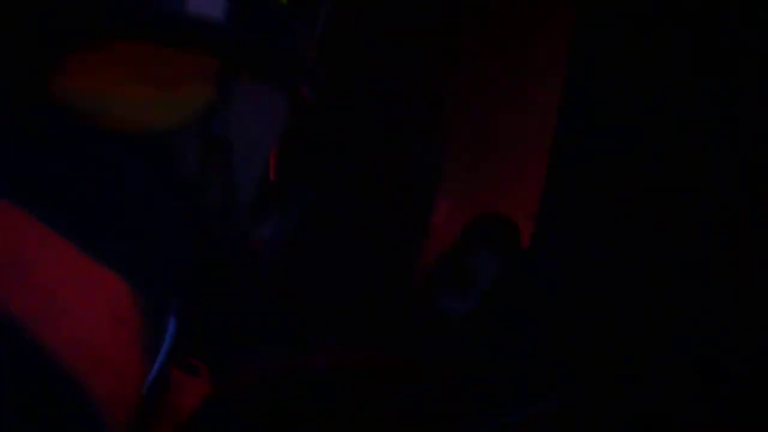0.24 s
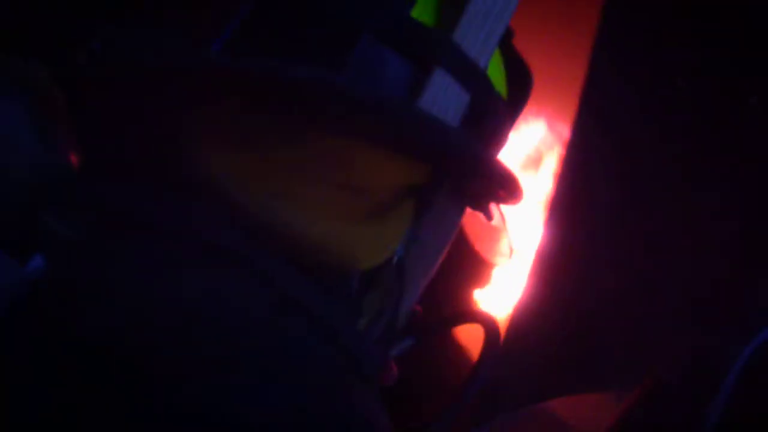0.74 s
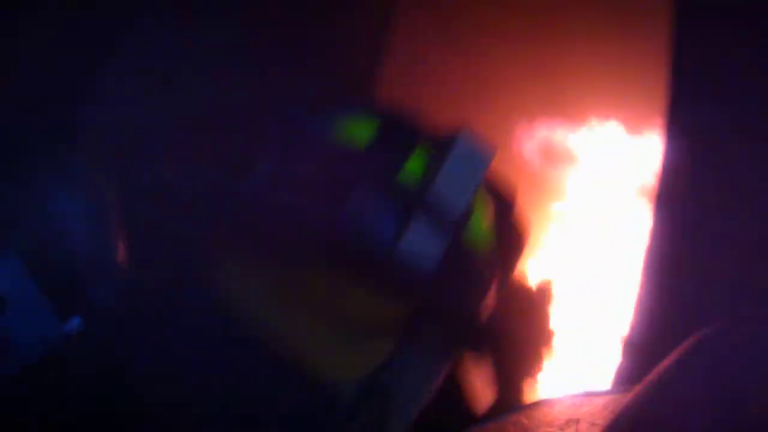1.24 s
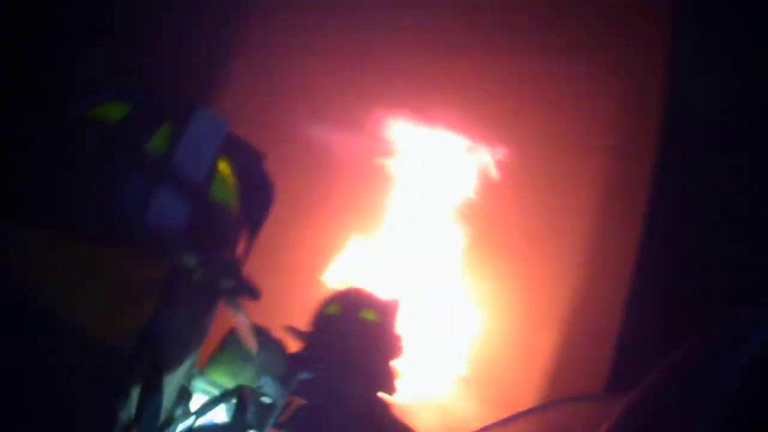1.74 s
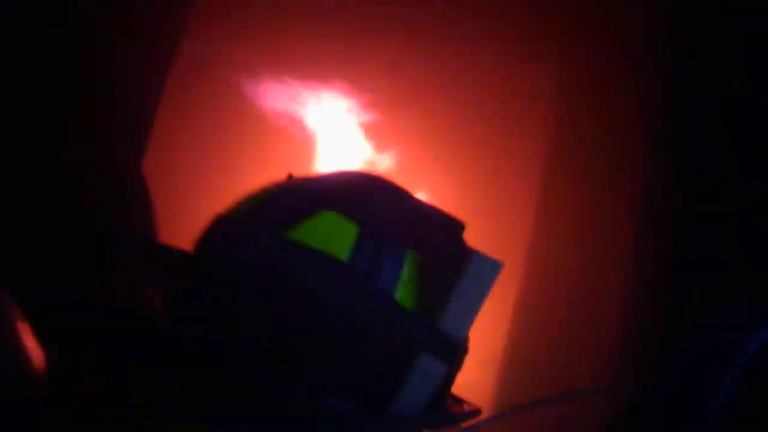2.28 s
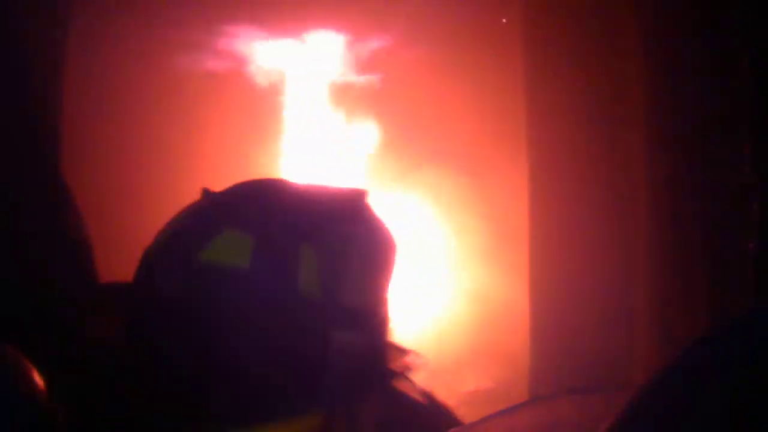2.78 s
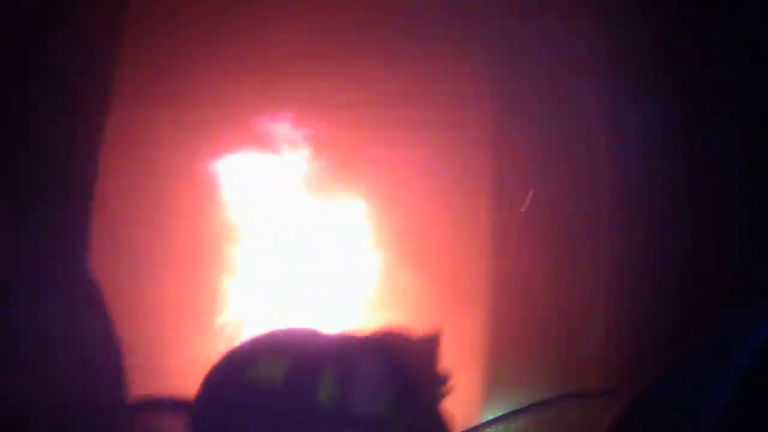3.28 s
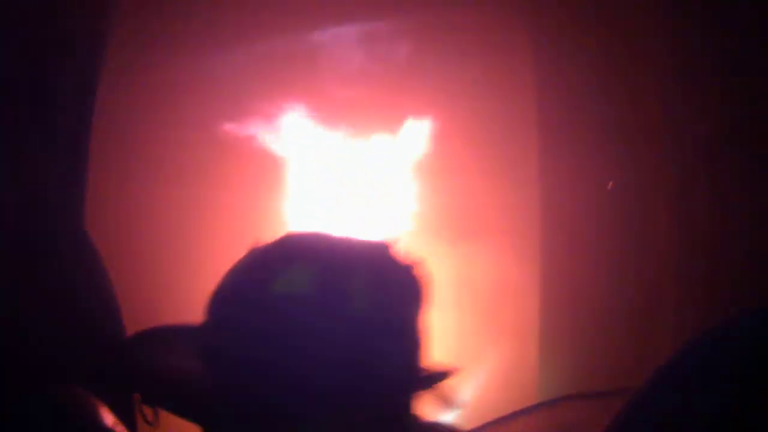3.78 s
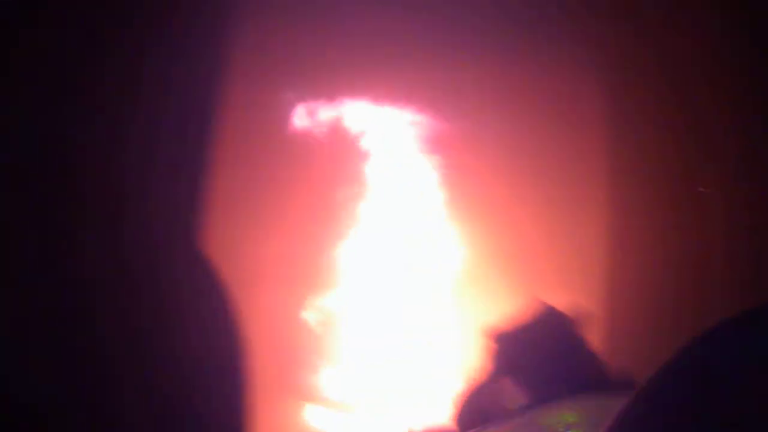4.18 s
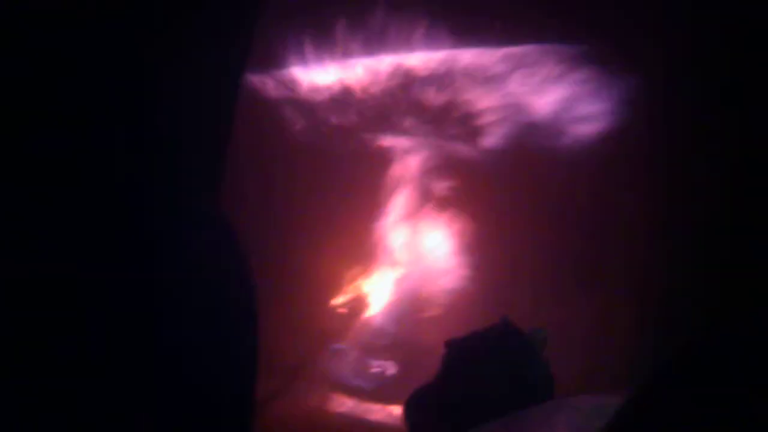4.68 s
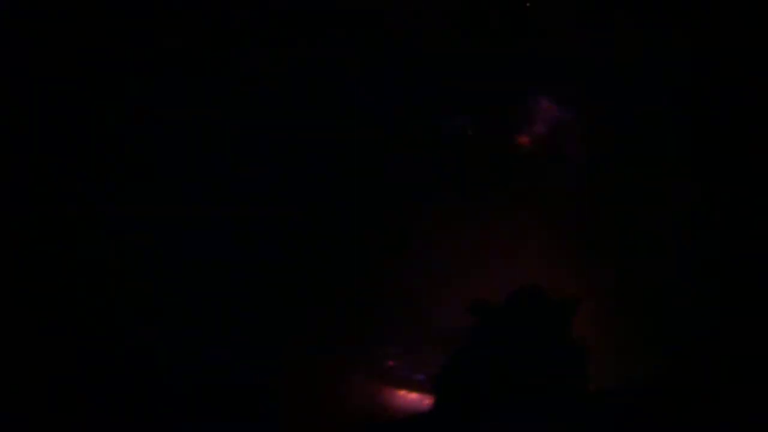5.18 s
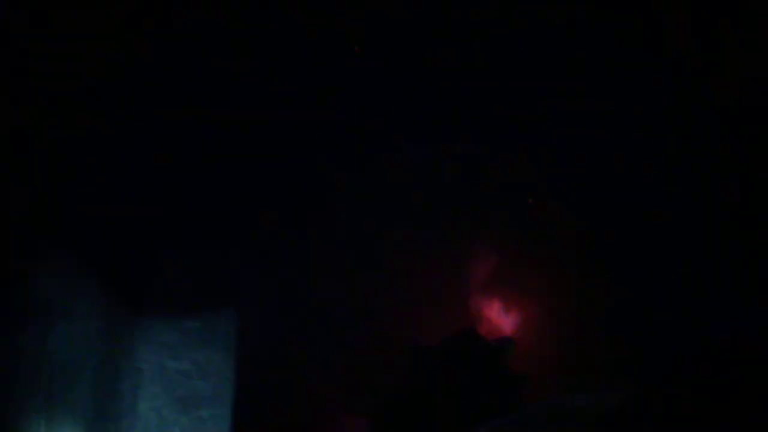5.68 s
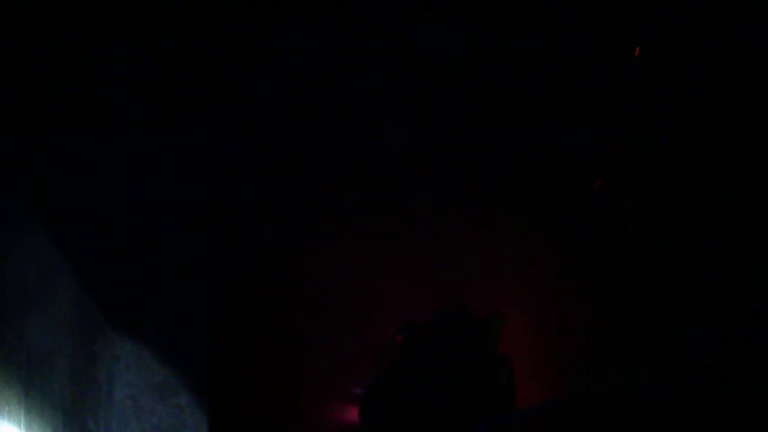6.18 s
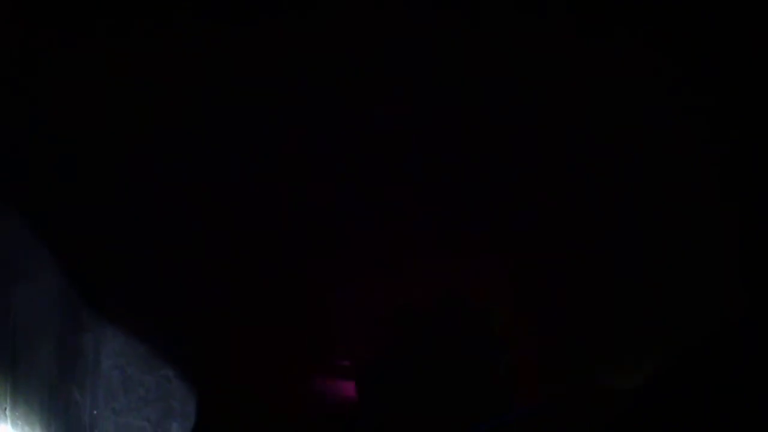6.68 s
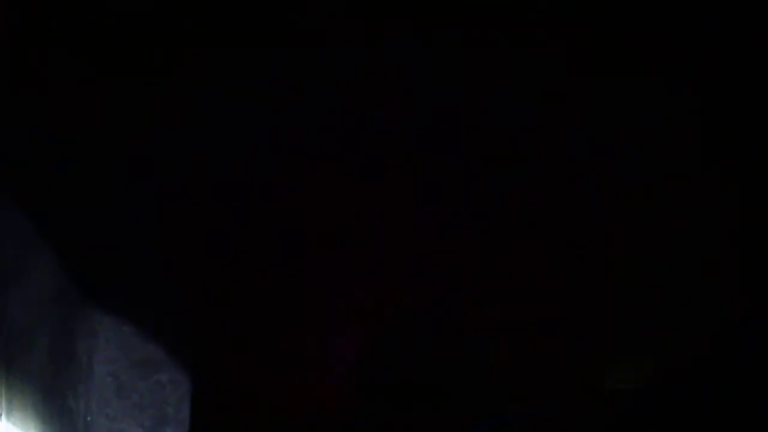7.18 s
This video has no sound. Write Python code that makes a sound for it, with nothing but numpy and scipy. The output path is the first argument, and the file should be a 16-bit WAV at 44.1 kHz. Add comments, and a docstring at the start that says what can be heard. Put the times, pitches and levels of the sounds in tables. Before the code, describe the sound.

Firefighting gear clicks and clatters close up while a water hose hisses in surges and a fire rumbles faintly.

```python
"""A thin hiss of hose spray and a clatter of gear, heard from a closed housing on a helmet in a
burning building. The housing's resonances colour the spray, which sputters and comes in surges over
a low rumble of fire and movement. Gear knocks and rattles, a strap or clip ticks on the housing,
shoves pull the microphone's diaphragm and let it snap back, and soft bumps set the shell humming."""
import sys
import numpy as np
from scipy import signal
from scipy.fft import rfft, irfft
from scipy.io import wavfile

SR = 44100
rng = np.random.default_rng(int(sys.argv[2]) if len(sys.argv) > 2 else 0)


def to_wav(sig):
    """Store sig (one row per channel, or 1-D mono) as 16-bit WAV at the path in sys.argv[1].

    Samples outside -1..1 are clipped; the rate is SR.
    """
    pcm = np.clip(np.atleast_2d(sig), -1, 1) * 32767
    pcm = np.round(pcm).astype(np.int16)
    wavfile.write(sys.argv[1], SR, pcm.T)  # frames by channels


N = 328104

# The spray's bed between surges. Each row: time in seconds, hiss in dB, treble in dB relative to the hiss.
SPRAY_BED = [(0.0, -57.5, -9.5), (0.17, -64.5, -8.5), (0.4, -63, -8), (0.69, -57.5, -11.5),
             (0.8, -60.5, -11), (1.08, -60, -11), (1.2, -50, -16.5), (1.47, -60, -12), (1.76, -54, -13.5),
             (2.02, -57, -14.5), (2.5, -54.5, -13), (3.4, -54.5, -14.5), (4.5, -53.5, -13.5),
             (5.15, -55, -18.5), (5.6, -53.5, -16), (6.0, -53, -20.5), (6.5, -54.5, -17), (7.2, -54.5, -18),
             (7.44, -54.5, -12.5)]
# The jet surges, holds and drops back. Each row: start in seconds, hold in seconds, added hiss in dB.
SPRAY_SURGES = [(2.05, 0.035, -57.5), (2.617, 0.35, -51.5), (3.041, .21, -51.5), (3.525, 0.61, -51.5),
                (4.205, 0.064, -52), (4.387, 0.76, -50.5), (5.16, 0.082, -49.5), (5.309, .2, -50),
                (5.517, 0.19, -50), (5.793, 0.023, -60), (5.968, .04, -50.5), (6.048, 0.011, -52.5),
                (6.198, 0.052, -53.5), (6.309, 0.023, -51.5), (6.54, 0.15, -50), (6.661, .12, -50.5),
                (6.862, .14, -51), (7.032, 0.069, -53.5), (7.177, 0.021, -53.5), (7.248, .3, -49)]
# The housing's resonances. Each row: pitch in Hz, width in Hz, relative level in dB.
HOUSING_LOW_MODES = [(846, 630, -13.5), (1147, 99, -0.5), (1510, 121, 0), (1695, 187, 0), (2049, 181, 1),
                     (2620, 126, -1.5), (2984, 273, -5.5)]
HOUSING_MID_MODES = [(3700, 660, -34), (4665, 500, 27)]
HOUSING_HIGH_MODES = [(6180, 640, -6.5), (7730, 830, -4), (9520, 430, 0.5), (12460, 1030, -1.5),
                      (14440, 1100, -8), (16400, 730, -12)]
# The tone of fire and movement. Each row: frequency in Hz, relative spectral level in dB.
RUMBLE_SPECTRUM = [(8.8, -21), (15, 6.5), (123, -6), (173, -9.5), (203, -10.5), (355, -12.5), (424, -11.5),
                   (768, -20.5), (970, -28.5), (1100, -14.5), (1430, -22), (2420, -120)]
# The rumble's slow rise and fall. Each row: time in seconds, level in dB.
RUMBLE_LEVELS = [(0.0, -67.5), (0.6, -66.5), (2.2, -69), (2.6, -62), (3.35, -67), (3.7, -63.5),
                 (4.9, -64.5), (6.3, -66.5), (7.44, -65)]
# Gear hitting the housing. Each row: start in seconds, rattle level in dB, bright part and hollow part
# in dB relative to the rattle, seconds for the rattle to fall 60 dB.
GEAR_KNOCKS = [(0.0024, -54, -3, -20, 0.079), (0.026, -53, -12, -12, 0.034), (0.0783, -37, -9, -24, 0.069),
               (0.2358, -56, -15, -22, 0.037), (0.2668, -58, -23, -2, 0.037), (0.493, -51, -8, -8, 0.043),
               (0.5312, -45, -17, -24, 0.11), (0.558, -30.5, -11, -11, 0.036),
               (0.571, -43.5, -10, -8, 0.058), (0.623, -51.5, -6.5, -28, 0.034),
               (0.6404, -33, -23, -18, 0.021), (0.656, -43.5, -12.5, -0.5, 0.068),
               (0.7233, -51.5, -10, -11, 0.041), (0.8755, -43, -8, -16, 0.071),
               (0.9069, -47, -10.5, -28, 0.086), (1.108, -37.5, -9, -9.5, 0.051),
               (1.161, -37.5, -15.5, -15.5, 0.072), (1.297, -49.5, -15, -21, 0.17),
               (2.4139, -42.5, -11.5, -12, 0.058), (2.4465, -53, -12, -4, 0.036),
               (3.0596, -46.5, -17, -15, 0.09), (3.147, -40.5, -9.5, -32, 0.043),
               (3.484, -40, -17, -25, 0.047), (3.4917, -29.5, -13, -33, 0.04),
               (3.515, -47, -12, -22, 0.067), (3.5397, -50, -2, -19, 0.041), (3.5639, -39.5, -12, -27, 0.1),
               (3.5844, -40.5, -15, -20, 0.035), (3.5972, -45, -18, -15, 0.045),
               (4.0816, -35, -13.5, -31, 0.023), (4.6028, -42, -16, -18, 0.056),
               (4.627, -45, -14, -15, 0.049), (4.6415, -46, -20, -20, 0.038), (4.6568, -52, -6, -15, 0.045),
               (4.6899, -32, -13, -22, 0.056), (4.6954, -33, -17, -2.5, 0.027),
               (7.2555, -52, -4, -30, 0.045)]
# The four colours of knocked gear. Each row: pitch in Hz, width in Hz, relative level in dB.
GEAR_BODY_MODES = [(1953, 124, 1), (2683, 120, -2), (2932, 106, -7)]
GEAR_BRIGHT_MODES = [(3485, 87, 13.5), (4710, 490, 6), (6450, 92, -21), (7900, 114, -1),
                     (10060, 300, -11.5), (11970, 820, -6)]
GEAR_WOODY_MODES = [(1510, 160, 0)]
GEAR_HOLLOW_MODES = [(470, 61, 5), (256, 150, -4.5)]
# A strap or clip on the housing. Each row: start in seconds, envelope peak in dB, pitch in Hz,
# ring length in cycles, woody rattle in dB.
STRAP_TICKS = [(0.004, -42, 3400, 32, -60), (0.026, -47, 4540, 25, -60), (0.4938, -25.5, 4600, 2.6, -42.5),
               (0.5217, -36, 3600, 5.5, -66), (1.1074, -23.5, 4170, 8.1, -41),
               (1.1164, -36, 4680, 5.5, -54), (1.126, -41, 4880, 5.5, -50), (1.133, -31, 3710, 2.8, -58),
               (2.4457, -28.5, 4370, 10, -45), (2.463, -32, 3700, 4.6, -58), (3.0662, -42, 4600, 5.9, -58),
               (3.075, -47, 4990, 5.5, -60), (3.112, -43, 4960, 5.5, -67), (3.4788, -36, 3620, 6.4, -55),
               (3.5135, -28.5, 4250, 12, -46), (3.5504, -28.5, 4000, 5.4, -49),
               (3.979, -41, 4740, 5.5, -64), (4.6275, -21, 4260, 11, -41), (4.6436, -48, 4830, 5.5, -48),
               (4.6569, -26, 4500, 3.2, -40), (4.6663, -27, 3750, 3.7, -58), (4.6724, -42, 3600, 5.5, -63),
               (5.5778, -32.5, 9400, 3.4, -62)]
# Shoves on the helmet. Each row: time of deepest pull in seconds, depth in dB, build-up in seconds,
# release in seconds.
HELMET_SHOVES = [(.262, -55, .01, 0.024), (.486, -49, .004, 0.011), (.524, -36, 0.026, 0.003),
                 (1.088, -40, 0.0093, 0.014), (1.135, -35.5, 0.017, 0.0048), (2.406, -36.5, 0.029, 0.0052),
                 (2.465, -33.5, 0.0069, 0.003), (3.053, -42, 0.0035, 0.0063), (3.061, -43.5, 0.0038, 0.032),
                 (3.126, -41.5, 0.01, 0.015), (3.481, -30, 0.0025, 0.012), (3.512, -33.5, 0.0018, 0.0031),
                 (3.551, -27.5, .003, 0.0026), (3.566, -52, 0.0026, 0.0047), (3.984, -40.5, 0.024, 0.0041),
                 (4.079, -42.5, .035, 0.0055), (4.602, -32, 0.0034, 0.01), (4.648, -39, 0.012, 0.0069),
                 (4.669, -29, 0.0033, 0.0036), (4.68, -46, 0.0042, 0.0028)]
# Soft bumps on the shell. Each row: start in seconds, level in dB.
SHELL_BUMPS = [(0.268, -54), (0.83, -57), (1.201, -60), (1.754, -51), (5.24, -60), (5.589, -57.5),
               (6.66, -59), (6.796, -61), (7.279, -61)]


def from_db(db):
    """Turn dB into gain."""
    return 10 ** (np.asarray(db) / 20)


def rms_one(x):
    """Scale to rms 1."""
    return x / np.sqrt(np.mean(x ** 2) + 1e-20)


def curves(rows):
    """Draw each column of a timed table as a curve, one value a sample."""
    times, *columns = np.transpose(rows)
    return [np.interp(np.arange(N) / SR, times, column) for column in columns]


def drift(rate_hz):
    """A smooth random wobble of rms 1."""
    r = np.exp(-2 * np.pi * rate_hz / SR)
    return rms_one(signal.lfilter([1], [1, -2 * r, r * r], rng.standard_normal(N + SR))[SR:])


def resonance(x, hz, width_hz):
    """A two-pole resonance with gain 1 at its peak."""
    r = np.exp(-np.pi * width_hz / SR)
    poles = [1, -2 * r * np.cos(2 * np.pi * hz / SR), r * r]
    return signal.lfilter([(1 - r * r) / 2, 0, (r * r - 1) / 2], poles, x + 1e-18)


def modes(x, table, low_hz, high_hz):
    """Parallel resonances of alternating sign inside a band; white noise keeps its level."""
    band = signal.butter(3, [low_hz, high_hz], "band", fs=SR, output="sos")
    impulse = np.r_[1., np.zeros(4095)]   # runs ahead of the sound to set the gain
    out = sum((-1) ** k * from_db(db) * signal.sosfilt(band, resonance(np.r_[impulse, x], hz, width_hz))
              for k, (hz, width_hz, db) in enumerate(table))
    return out[len(impulse):] / np.sqrt(np.sum(out[:len(impulse)] ** 2))


def add(track, start, sound):
    """Mix a sound into a track, start in seconds."""
    at = round(start * SR)
    track[at:at + len(sound)] += sound[:N - at]


def hose_spray(sputter_db=1.21, flicker_db=0.18, rise_s=0.011, fall_s=0.023, treble_follows=0.74):
    """Jet noise rings the housing in three bands that surge and sputter together, the treble less so."""
    bed_db, treble_db = curves(SPRAY_BED)
    t, power = np.arange(N) / SR, from_db(bed_db) ** 2
    for start, hold, db in SPRAY_SURGES:
        corners = np.cumsum([start, rise_s, hold, fall_s])
        power += from_db(db) ** 2 * np.interp(t, corners, [0, 1, 1, 0])
    swell_db = 10 * np.log10(power) - bed_db + sputter_db * drift(22.0)
    low_db = bed_db + swell_db
    high_db = bed_db + treble_db + treble_follows * swell_db
    mid_db = (low_db + high_db) / 2 - 10
    low, mid, high = (from_db(db + flicker_db * drift(33.0)) * rng.standard_normal(N)
                      for db in (low_db, mid_db, high_db))
    return (modes(low, HOUSING_LOW_MODES, 430, 3380) + modes(mid, HOUSING_MID_MODES, 3100, 5530)
            + modes(high, HOUSING_HIGH_MODES, 3450, 18000))


def fire_rumble(lumpy_db=2.5):
    """Fire and movement lay down a low noise that swells in lumps."""
    hz, db = np.transpose(RUMBLE_SPECTRUM)
    bin_hz = np.arange(N // 2 + 1) * SR / N
    tone = from_db(np.interp(np.log(bin_hz + 1), np.log(hz), db))
    level_db = curves(RUMBLE_LEVELS)[0] + lumpy_db * drift(9.9)
    return from_db(level_db) * rms_one(irfft(rfft(rng.standard_normal(N)) * tone, N))


def gear_knocks(uneven_db=5.5, contact_db=6.5, woody_db=-15, hollow_stretch=2.0, tick_t60_s=0.042):
    """A firm contact and a dying, uneven rattle ring the gear; strap ticks stir its woody mode too."""
    body, bright, woody, hollow = np.zeros((4, N))
    t = np.arange(SR // 5) / SR
    noise, unevenness = rng.standard_normal((2, len(GEAR_KNOCKS) + len(STRAP_TICKS), len(t)))
    rattles = noise * from_db(uneven_db * unevenness)
    rattles[:, :6] = from_db(contact_db)   # a blunt first contact
    # the hollow cavity speaks late and rings longer
    hollow_attack = 1 - np.exp(-t / 0.0018)
    for (start, db, bright_db, hollow_db, t60), rattle, air in zip(GEAR_KNOCKS, rattles, noise):
        fall_db = -60 * t / t60
        for track, part_db in (body, 0), (bright, bright_db), (woody, woody_db):
            add(track, start, rattle * from_db(db + part_db + fall_db))
        add(hollow, start, air * hollow_attack * from_db(db + hollow_db + fall_db / hollow_stretch))
    for (start, *_, db), rattle in zip(STRAP_TICKS, rattles[len(GEAR_KNOCKS):]):
        add(woody, start, rattle * from_db(db - 60 * t / tick_t60_s))
    return (modes(body, GEAR_BODY_MODES, 1310, 4340) + modes(bright, GEAR_BRIGHT_MODES, 2980, 15200)
            + modes(woody, GEAR_WOODY_MODES, 840, 2110) + modes(hollow, GEAR_HOLLOW_MODES, 150, 910))


def strap_ticks():
    """A strap or clip taps the housing: a small, dry ping that swells and dies in milliseconds."""
    out, t = np.zeros(N), np.arange(SR // 100) / SR
    for start, db, hz, cycles, _ in STRAP_TICKS:
        age = 8 * t * hz / cycles   # 1 at the envelope's peak
        add(out, start, from_db(db) * age * np.exp(1 - age) * np.sin(2 * np.pi * hz * t))
    return out


def helmet_shoves(settle_s=0.026, judder_db=-16, judder_s=0.025):
    """Pressure on the diaphragm sinks ever faster, snaps past rest and settles; the mount judders."""
    thumps, judder = np.zeros((2, N))
    t = np.arange(SR // 5) / SR
    for deepest, db, build, release in HELMET_SHOVES:
        overshoot = 0.059 + 39 * release   # a slow release swings further past rest
        pull = -np.linspace(0, 1, round(build * SR)) ** 2.3
        snap = (1 + overshoot) * np.sin(np.linspace(0, np.pi / 2, round(release * SR))) ** 2 - 1
        settle = overshoot * np.exp(-t / settle_s)
        add(thumps, deepest - build, from_db(db) * np.r_[pull, snap, settle])
        add(judder, deepest, from_db(db + judder_db) * np.exp(-t / judder_s))
    mount_band = signal.butter(1, [70, 350], "band", fs=SR, output="sos")
    return thumps + judder * rms_one(signal.sosfilt(mount_band, rng.standard_normal(N)))


def helmet_shell(hz=172.5, attack_s=0.0082, t60_s=0.3, hum_db=-79.5):
    """The shell rings on one low note after each bump and hums faintly on it throughout."""
    rings, t = np.zeros(N), np.arange(SR // 2) / SR
    note = (1 - np.exp(-t / attack_s)) * np.sin(2 * np.pi * hz * t)
    for start, db in SHELL_BUMPS:
        add(rings, start, from_db(db - 60 * t / t60_s) * note)
    hum = rms_one(resonance(rng.standard_normal(N), hz, width_hz=5.6))
    return rings + from_db(hum_db) * hum


def scene():
    """A mono mix: spray comes through the housing, touches reach the diaphragm through its mount."""
    touches = gear_knocks() + strap_ticks() + helmet_shoves()
    return (hose_spray() + touches + helmet_shell() + fire_rumble())[None]


def record(dry):
    """A gentle low cut at 6 Hz and a steep high cut at 16 kHz."""
    dry = signal.sosfilt(signal.butter(1, 6.0, "high", fs=SR, output="sos"), dry)
    return signal.sosfilt(signal.cheby2(20, 60, 16000, fs=SR, output="sos"), dry)


dry = scene()
out = record(dry)
to_wav(out)
```